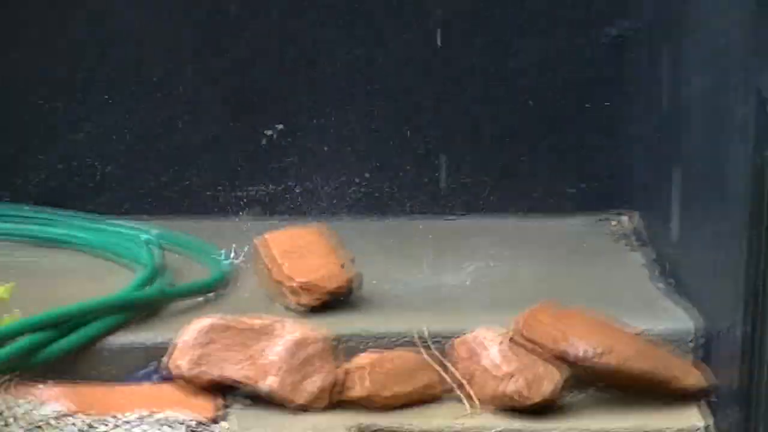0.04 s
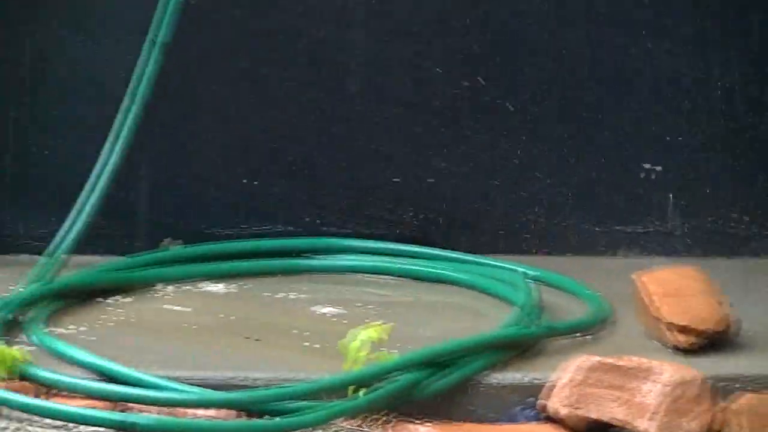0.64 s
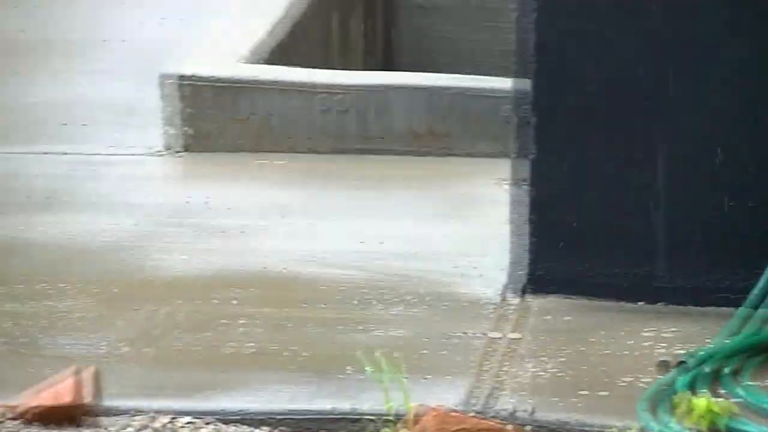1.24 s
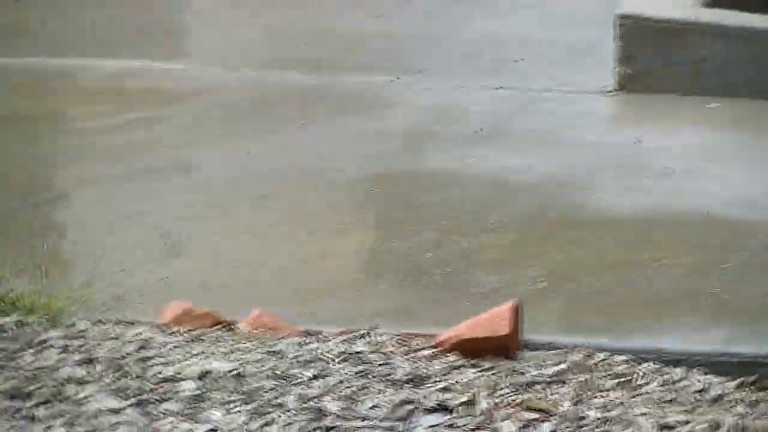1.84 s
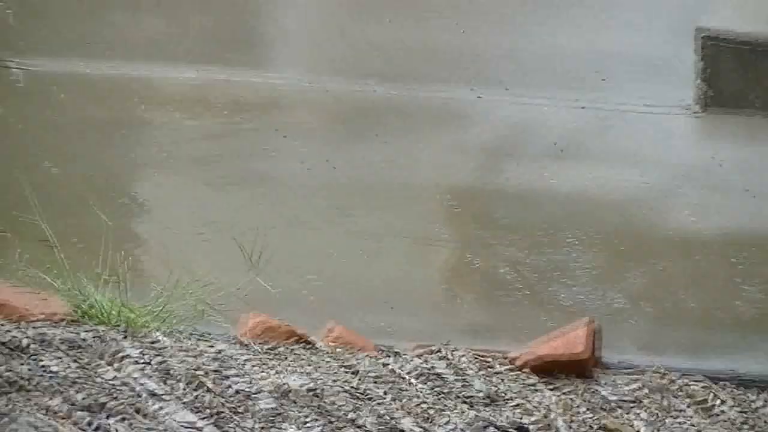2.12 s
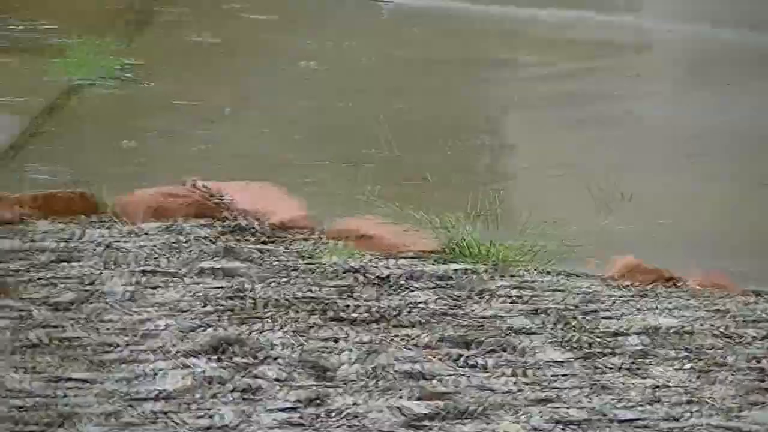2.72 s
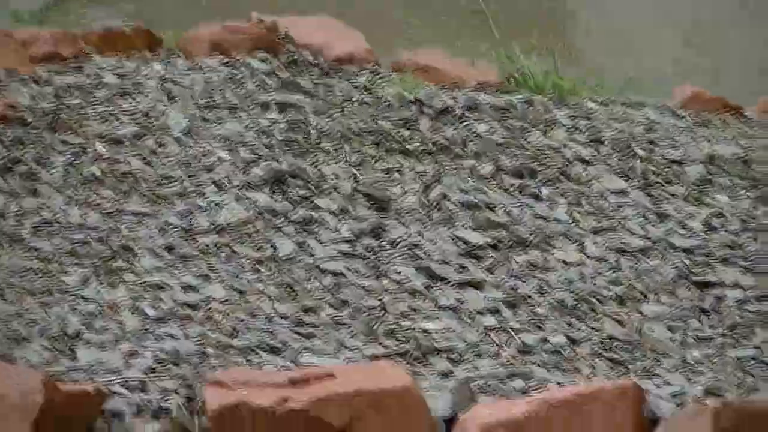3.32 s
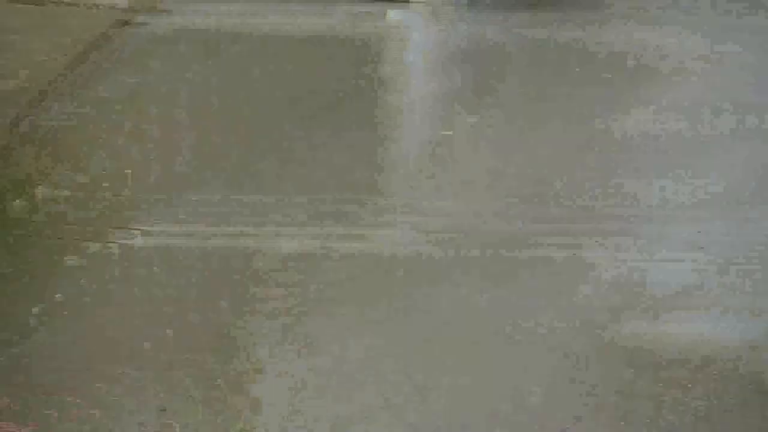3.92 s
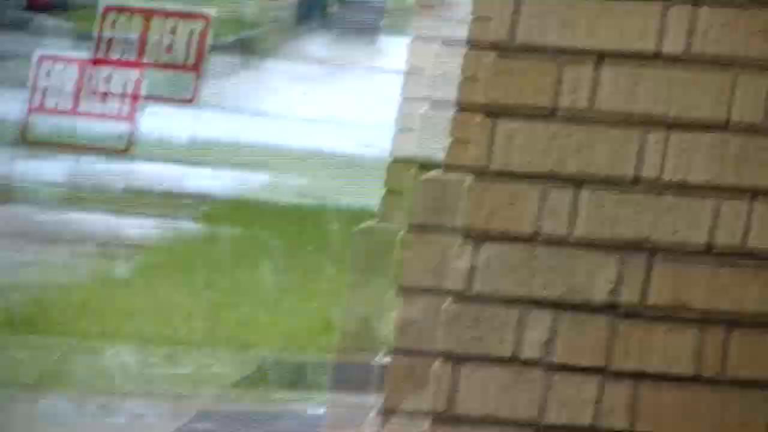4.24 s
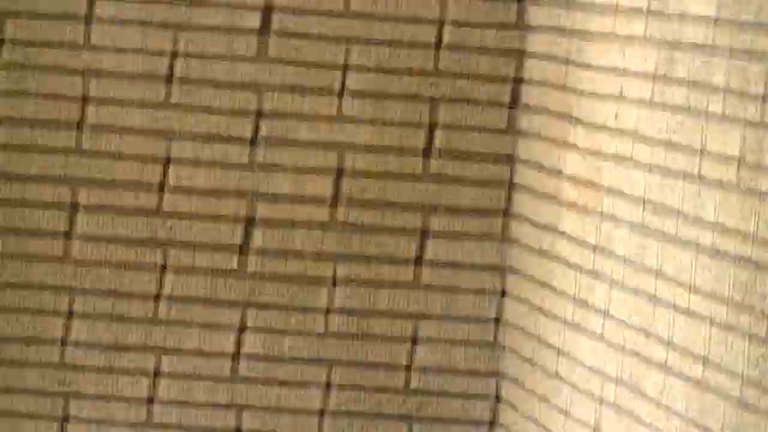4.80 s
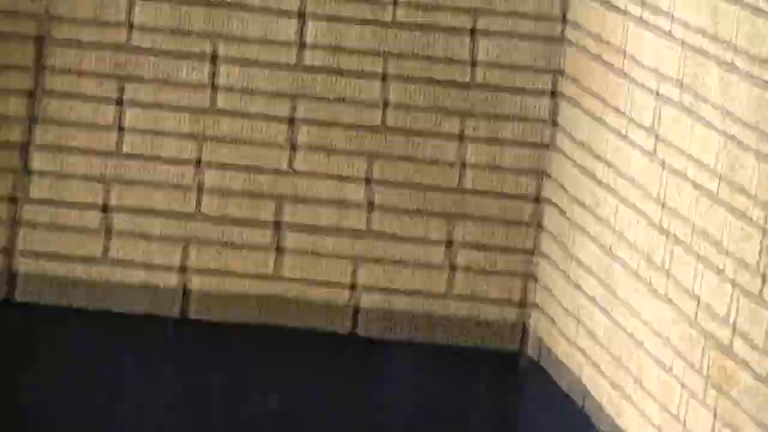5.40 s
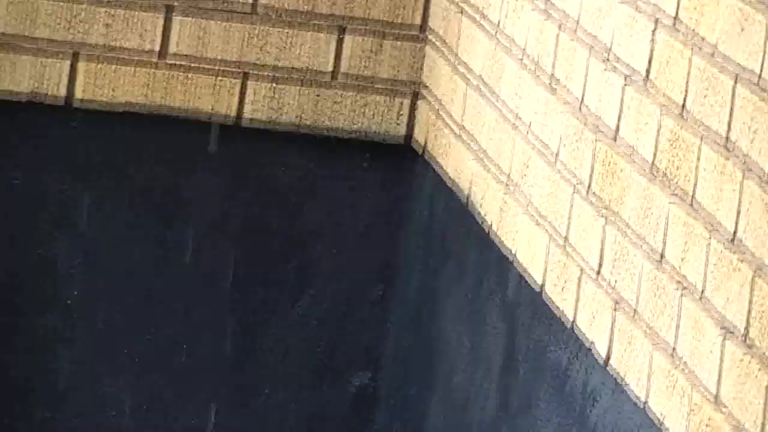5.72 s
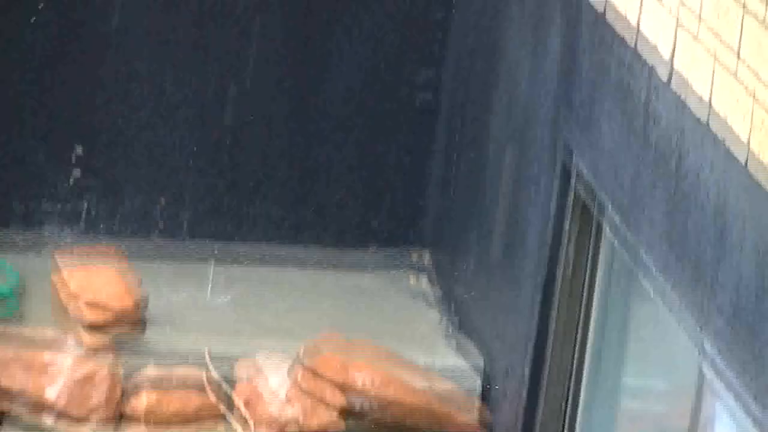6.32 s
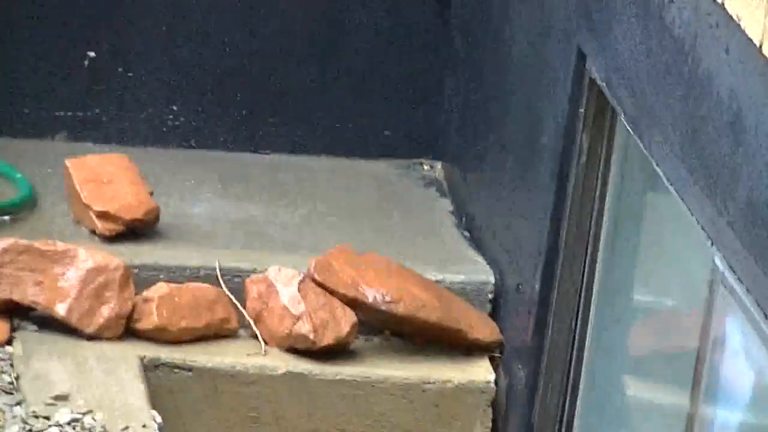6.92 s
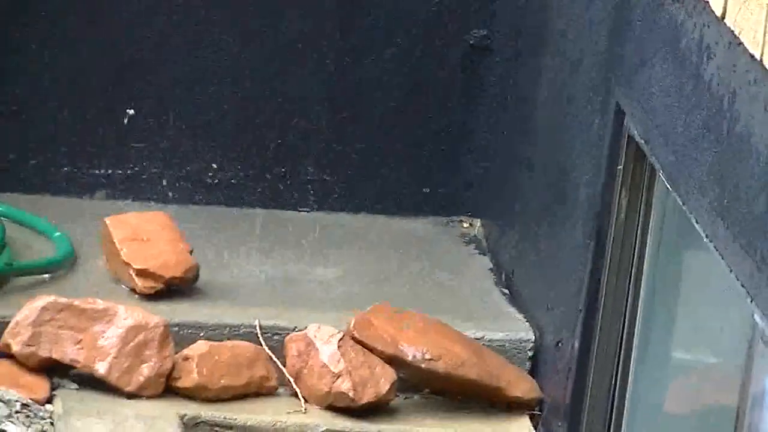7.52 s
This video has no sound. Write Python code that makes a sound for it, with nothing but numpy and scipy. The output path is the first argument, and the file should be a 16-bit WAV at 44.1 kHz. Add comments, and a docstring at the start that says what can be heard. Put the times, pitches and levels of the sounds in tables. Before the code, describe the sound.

Quick, sharp drips splash onto a concrete ledge outdoors, easing briefly midway, over soft rain and a faint engine drone.

```python
"""A gutter overflows onto a concrete ledge in a house corner, over light rain and a far engine's hum.
From the start heavy drops fall fast: each pops, the wall echoes it 2 ms later, then its spray patters.
Light leaks and raindrops tick in between. From 1.7 to 4.2 s a few drops plink in a puddle, each ringing
a trapped bubble, while the heavy drops thin out. These pick up again near 4 s and run to the end;
after 6 s faint knocks, low tones and hisses come from farther off."""
import sys
import numpy as np
from scipy import signal
from scipy.fft import rfft, irfft
from scipy.io import wavfile

SR = 44100
rng = np.random.default_rng(int(sys.argv[2]) if len(sys.argv) > 2 else 0)


def persist_wave(psi):
    """Save psi, clipped to +-1, as 16-bit WAV."""
    counts = np.round(np.clip(psi, -1, 1) * 32767).astype(np.int16)
    wavfile.write(sys.argv[1], SR, np.atleast_2d(counts).T)


N = 332955
WALL_MS, WALL_SPREAD_MS = 2.03, .45  # echo delay; varies with the landing spot


def amp(db):
    return 10 ** (np.asarray(db) / 20)


def unit_rms(x):
    return x / np.sqrt(np.mean(x ** 2) + 1e-20)


def add(mix, start_s, sound):
    part = mix[max(round(start_s * SR), 0):][:len(sound)]
    part += sound[:len(part)]


def colour(x, curve):
    """Filter by a (frequency [Hz], gain [dB]) curve on a log-frequency axis."""
    hz, db = np.transpose(curve)
    bins_hz = np.fft.rfftfreq(len(x), 1 / SR)
    gain = amp(np.interp(np.log(bins_hz + 1), np.log(hz), db))
    return irfft(rfft(x) * gain, len(x))


def resonance(x, hz, width_hz):
    """Band-pass, peak gain 1."""
    q = hz / min(width_hz, SR / 3)
    return signal.lfilter(*signal.iirpeak(min(hz, SR / 2.2), q, fs=SR), x)


def drift(cutoff_hz):
    """Slow random motion, rms 1."""
    bins_hz = np.fft.rfftfreq(N, 1 / SR)
    return unit_rms(irfft(rfft(rng.standard_normal(N)) / (1 + (bins_hz / cutoff_hz) ** 4), N))


# Rain and street spectrum: (frequency [Hz], relative density [dB])
WASH_SPECTRUM = [(25, -3), (50, -2), (75, 6), (100, 2), (140, 9), (240, 2.5), (430, -0.5), (760, 5),
                 (1100, 0), (1600, 0), (2600, -8), (5000, -8.5), (10000, -18), (16000, -27)]
def rain_wash(level_db=-40.0, swell_db=-0.22):
    """Far rain and street: coloured noise, swelling slightly."""
    gain = amp(level_db + swell_db * drift(0.55))
    return gain * unit_rms(colour(rng.standard_normal(N), WASH_SPECTRUM))


# Engine harmonics: (multiple of firing rate, relative level [dB])
ENGINE_HARMONICS = [(1, -2.5), (2, -10.5), (4, -10), (8, -23)]
# Engine loudness: (time [s], level [dB])
ENGINE_LEVEL = [(0, -51.5), (1.4, -50.5), (2.35, -49.5), (3.6, -56), (4.1, -47), (4.8, -51), (5.35, -47),
                (6.1, -51.5), (6.55, -48), (7.5, -58)]
def far_engine(firing_hz=80.36, waver=.013, flutter_db=2.0):
    """Harmonics of a wavering firing rate, fading in and out."""
    firings = np.cumsum(firing_hz * (1 + waver * drift(1.205))) / SR
    level_db = np.interp(np.arange(N) / SR, *np.transpose(ENGINE_LEVEL))
    out = np.zeros(N)
    for multiple, db in ENGINE_HARMONICS:
        rms = amp(level_db + db + flutter_db * drift(1.5))
        out += rms * np.sqrt(2) * np.sin(2 * np.pi * multiple * firings)
    return out


# Faint far sounds: (time [s], length [s], centre [Hz], width [Hz], level [dB])
FAR_SOUNDS = [(2.452, 0.013, 1200, 1500, -35.5), (3.154, 0.38, 1540, 300, -52),
              (6.038, 0.014, 1540, 1200, -35), (6.096, 0.062, 225, 89, -44.5), (6.74, .11, 626, 25, -44.5),
              (6.879, 0.022, 600, 700, -34.5), (7.116, 0.44, 3140, 600, -44),
              (7.156, 0.55, 1150, 900, -45.5)]
def far_sounds():
    """Dull knocks, brief low tones and thin hisses: one noise band each."""
    out = np.zeros(N)
    for start_s, length_s, hz, width_hz, db in FAR_SOUNDS:
        noise = resonance(rng.standard_normal(SR), hz, width_hz)
        noise = resonance(noise, hz, width_hz)[-int(length_s * SR):]
        add(out, start_s, amp(db) * unit_rms(noise * signal.windows.tukey(len(noise), .5)))
    return out


# Loudness of raindrops, leaks and mist as the flow swells and eases: (time [s], gain [dB])
FINE_WATER_GAIN = [(0.0, -36), (1.16, -35), (1.72, -37), (2.06, -33.5), (2.73, -36.5), (3.05, -34),
                   (4.08, -39), (4.54, -35), (5.47, -37.5), (5.84, -33.5), (6.08, -34.5), (7.55, -35.5)]
def fine_water_gain():
    """Linear gain per sample."""
    return amp(np.interp(np.arange(N) / SR, *np.transpose(FINE_WATER_GAIN)))


def wall_delay_ms():
    """Echo delay for a random spot in the strip along the wall."""
    return WALL_MS + WALL_SPREAD_MS * rng.uniform(-1, 1)


# Modes of the hollow between ledge, stones and wall: (centre [Hz], width [Hz], gain [dB])
HOLLOW_MODES = [(2250, 350, 0), (3080, 250, -1.5), (4150, 1000, -2)]
def drop(hz, echo_ms, pop_s=92e-6, snap_s=.0005, scatter=0.63, scatter_s=0.002, far_lag_ms=5.2):
    """Pop and snap of a flattening drop, echoed by two walls, scattered by stones; rms 1."""
    t = np.arange(1024) / SR
    snap_noise, stone_noise = rng.standard_normal((2, len(t)))
    age = t / pop_s  # same length at any pitch: high pops sound more tonal
    pop = age * np.exp(1 - age) * np.sin(2 * np.pi * (hz * t + rng.random()))
    snap = unit_rms(resonance(snap_noise, min(1.8 * hz, SR / 4), 1.2 * hz)) * np.exp(-t / snap_s)
    build_up = 1 - np.exp(-(t * 1000 / echo_ms) ** 2)
    tail = stone_noise * build_up * np.exp(-t / scatter_s)
    tail /= np.linalg.norm(tail)
    ring = sum(amp(db) * resonance(tail, mode_hz, width_hz) for mode_hz, width_hz, db in HOLLOW_MODES)
    response = scatter * tail + ring
    for delay_ms, gain in ((0, 1), (echo_ms, 0.54), (echo_ms + far_lag_ms, 0.22)):
        add(response, delay_ms / 1000, np.array([gain]))
    return unit_rms(signal.fftconvolve(pop + .4 * snap, response))


def raindrops(count=300, relative_db=-6, spread_db=4.0, hz=7800, pitch_spread=0.36):
    """Small drops at random times, all along the wall."""
    out, gain = np.zeros(N), fine_water_gain()
    onsets = rng.random(count) * N
    sizes, pitches, spots = np.clip(rng.standard_normal((3, count)), -2, 2)
    for onset, size, pitch, spot in zip(onsets, sizes, pitches, spots):
        pop = drop(hz * np.exp(pitch_spread * pitch), WALL_MS + WALL_SPREAD_MS * spot, pop_s=110e-6)
        add(out, onset / SR, amp(relative_db + spread_db * min(size, 1)) * gain[int(onset)] * pop)
    return out


def leaks(count=3, drops_per_s=3.4, jitter=.3, relative_db=-2.5, spread_db=1, hz=5900, pitch_spread=0.28):
    """Each leak fills and lets go at its own near-even pace, always onto one spot."""
    out, gain = np.zeros(N), fine_water_gain()
    for pace in np.geomspace(.8, 1.25, count):
        wait, size, pitch = np.clip(rng.standard_normal((48, 3)), -2, 2).T
        times_s = (np.cumsum(np.exp(jitter * wait)) - rng.random()) / (drops_per_s * pace)
        levels_db = relative_db + spread_db * size
        pitches_hz = hz * np.exp(pitch_spread * pitch)
        echo_ms = wall_delay_ms()
        for start_s, db, pop_hz in zip(times_s, levels_db, pitches_hz):
            onset = int(np.clip(start_s * SR, 0, N - 1))
            add(out, start_s, amp(db) * gain[onset] * drop(pop_hz, echo_ms, pop_s=140e-6))
    return out


def droplets(hz, spots=8, per_s_per_hz=.055, spread_db=5.0, decay_cycles=0.75, echo_ms=2.1, echo=0.55):
    """Crackle of tiny pops near one pitch, each with a wall echo; finer means denser; rms 1."""
    t, out = np.arange(300) / SR, np.zeros(N)
    step = 8  # onset grid, samples
    chance = step * per_s_per_hz * hz / spots / SR
    for detune, spot in rng.uniform(-1, 1, (spots, 2)):
        onsets = np.flatnonzero(rng.random(N // step) < chance) * step
        sizes = amp(spread_db * np.minimum(rng.exponential(1, len(onsets)), 4))
        sizes *= rng.choice([-1, 1], len(onsets))
        age = t * hz * (1 + detune / 10) / decay_cycles
        pop = age * np.exp(-age) * np.sin(2 * np.pi * decay_cycles * age)
        add(pop, echo_ms * (1 + spot / 2) / 1000, echo * pop)
        samples = onsets[:, None] + np.arange(len(t))
        out += np.bincount(samples.ravel(), np.outer(sizes, pop).ravel(), N)[:N]
    return unit_rms(out)


# Spray spectrum: (frequency [Hz], relative density [dB])
SPRAY_SPECTRUM = [(1500, -15), (2500, -3), (4400, 1), (6500, -2), (10500, 4.5), (15000, -24)]
def spray(drips, patter_db=(-16, -18), patter_decay_s=(0.022, 0.026), mist_db=-4, spread_oct=.65):
    """Each heavy drop bursts into a short patter of droplets near its pitch, over a fine mist."""
    times_s, drip_db, pop_hz = np.transpose(drips)
    onsets = np.clip((times_s + WALL_MS / 1000) * SR, 0, N - 1).astype(int)
    bands_hz = np.geomspace(2000, 14500, 16)
    curve_hz, curve_db = np.transpose(SPRAY_SPECTRUM)
    band_shares = bands_hz * amp(np.interp(np.log(bands_hz), np.log(curve_hz), curve_db)) ** 2
    band_shares /= band_shares.sum()
    offset_oct = np.log2(bands_hz[:, None] / pop_hz)
    drip_shares = band_shares[:, None] * np.exp(-.5 * (offset_oct / spread_oct) ** 2)
    drip_shares /= drip_shares.sum(0)
    mist_power = (amp(mist_db) * fine_water_gain()) ** 2
    out = np.zeros(N)
    for hz, band_share, drip_share in zip(bands_hz, band_shares, drip_shares):
        bursts = np.bincount(onsets, drip_share * amp(drip_db) ** 2, N) + 1e-20
        power = band_share * mist_power
        for db, decay_s in zip(patter_db, patter_decay_s):
            power += amp(db) ** 2 * signal.lfilter([1], [1, -np.exp(-1 / (decay_s * SR))], bursts)
        out += droplets(hz) * np.sqrt(power)
    return out


# Drops into the puddle: (time [s], relative level [dB], bubble pitch [Hz])
PUDDLE_PLINKS = [(1.6716, -21, 2000), (1.9792, -19, 3080), (2.2081, -22, 2930), (2.4145, -24.5, 3060),
                 (3.011, -24.5, 3000), (3.6866, -24.5, 2960), (4.1584, -18.5, 3050)]
def puddle_plinks(pop_db=-11, pop_hz=4570, bubble_db=7, bubble_s=0.0024):
    """A soft pop, then the trapped bubble rings briefly."""
    out, t = np.zeros(N), np.arange(1024) / SR
    envelope = (1 - np.exp(-4 * t / bubble_s)) * np.exp(-t / bubble_s)
    for start_s, db, bubble_hz in PUDDLE_PLINKS:
        add(out, start_s, amp(db + pop_db) * drop(pop_hz, wall_delay_ms()))
        add(out, start_s, amp(db + bubble_db) * envelope * np.sin(2 * np.pi * bubble_hz * t))
    return out


# Heavy drops on the concrete: (time [s], relative level [dB], pop pitch [Hz])
HEAVY_DRIPS = [(0.0164, -20, 4500), (0.1207, -23.5, 6550), (0.1347, -28, 8000), (0.161, -22, 6900),
               (0.1795, -22, 4260), (0.2154, -24.5, 6500), (0.31, -20.5, 3870), (0.3618, -24.5, 5570),
               (0.384, -14.5, 5000), (0.458, -19.5, 9400), (0.526, -16.5, 6750), (0.6, -20, 6700),
               (0.663, -18, 6300), (0.682, -19.5, 5240), (0.8229, -15, 4100), (0.9143, -15, 7850),
               (1.0249, -14, 4630), (1.0958, -19, 8800), (1.1436, -16, 6600), (1.1694, -18, 5900),
               (1.2416, -22, 5200), (1.2679, -17, 5000), (1.31, -15, 8700), (1.4217, -17.5, 4860),
               (1.4626, -27, 7400), (1.506, -23, 5400), (1.5688, -21.5, 5940), (1.7478, -21.5, 4630),
               (1.8337, -25, 5270), (1.923, -21.5, 9200), (1.939, -19, 4630), (2.0337, -13, 5100),
               (2.057, -25, 5400), (2.1276, -22.5, 6440), (2.3038, -28, 7150), (2.368, -23, 7600),
               (2.4564, -26.5, 5200), (2.6577, -26, 5500), (2.7394, -23.5, 5730), (3.2056, -27, 9600),
               (3.2225, -22.5, 8000), (3.2507, -23, 5800), (3.824, -22.5, 4630), (3.8407, -27, 5050),
               (3.8574, -23, 3860), (4.011, -25, 5960), (4.0283, -21.5, 5570), (4.0744, -23.5, 4940),
               (4.0913, -23.5, 5200), (4.3524, -16.5, 3400), (4.623, -13, 6350), (4.7173, -22.5, 6840),
               (4.825, -25.5, 5500), (4.897, -24.5, 6500), (4.9457, -21.5, 7150), (4.9695, -25, 4600),
               (5.0056, -21.5, 5700), (5.036, -21.5, 7850), (5.2098, -18.5, 4400), (5.2559, -21.5, 6900),
               (5.3727, -18.5, 3900), (5.4756, -28.5, 4430), (5.5934, -20, 5400), (5.6766, -23, 6300),
               (5.705, -23.5, 5000), (5.7427, -15.5, 4380), (5.7584, -18.5, 5550), (5.8155, -23, 4830),
               (5.8435, -17.5, 6240), (6.014, -22.5, 6700), (6.1173, -26, 6400), (6.291, -26, 4870),
               (6.381, -17, 6150), (6.4364, -25, 4280), (6.4557, -17.5, 4870), (6.5718, -28, 4800),
               (6.6176, -28, 7400), (6.7762, -24, 4940), (6.807, -22, 4160), (6.9308, -21, 4230),
               (7.0197, -14.5, 4240), (7.042, -22.5, 6160), (7.2575, -26, 5330), (7.3512, -20.5, 5430),
               (7.43, -21.5, 6670)]
def heavy_drips(gain_db=-8.0):
    """Gutter overflow hits the ledge, each drop on its own spot."""
    out = np.zeros(N)
    for start_s, db, pop_hz in HEAVY_DRIPS:
        add(out, start_s, amp(db + gain_db) * drop(pop_hz, wall_delay_ms()))
    return out


def yard_echoes(x, delays_s=(0.012, .0375), echo_db=-22):
    """Two farther walls add faint slaps."""
    out = x.copy()
    for delay_s in delays_s:
        add(out, delay_s, amp(echo_db) * x)
    return out


def scene(highpass_hz=1500, water_side_db=-27, wash_side_db=-21.0):
    """Stereo mix: water near centre, widened a little by the walls; street slightly left."""
    drips = heavy_drips() + puddle_plinks() + leaks() + raindrops()
    drips = signal.sosfilt(signal.butter(3, highpass_hz, "high", fs=SR, output="sos"), drips)
    water = yard_echoes(drips) + spray(HEAVY_DRIPS)
    street = rain_wash() + far_engine() + far_sounds()
    diffuser = irfft(np.exp(2j * np.pi * rng.random(129)))  # flat gain, random phase
    side = amp(water_side_db) * signal.oaconvolve(water, diffuser)[:N] + amp(wash_side_db) * rain_wash()
    water_pan, street_pan = amp([[-.12], [.12]]), amp([[.35], [-.35]])
    return water * water_pan + street * street_pan + np.array([side, -side])


# Microphone treble response: (frequency [Hz], gain [dB])
MIC_RESPONSE = [(11000, 0.5), (13000, 1.5), (15000, -5)]
def record(dry, knee=0.35, cutoff_hz=15900):
    """Microphone: dulled top treble, soft overload on the sharpest pops, band limit."""
    heard = np.array([colour(channel, MIC_RESPONSE) for channel in dry])
    excess = np.maximum(abs(heard) - knee, 0)
    clipped = np.sign(heard) * (abs(heard) - excess + (1 - knee) * np.tanh(excess / (1 - knee)))
    lowpass = signal.firwin(255, cutoff_hz, window=("kaiser", 8), fs=SR)
    return signal.oaconvolve(clipped, lowpass[None], "same")


dry = scene()
out = record(dry)
persist_wave(out)
```